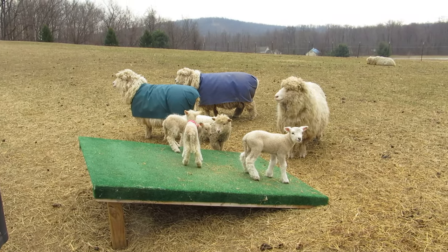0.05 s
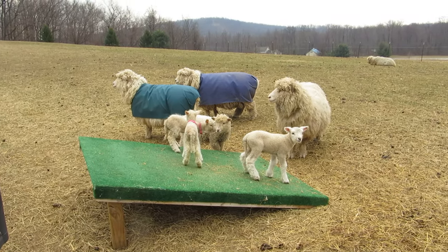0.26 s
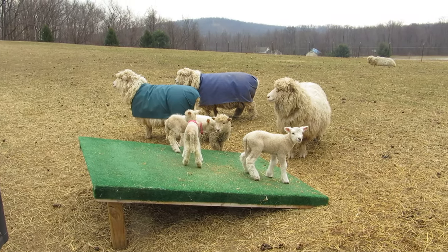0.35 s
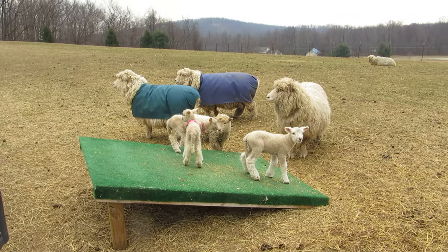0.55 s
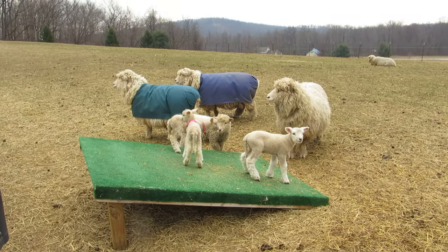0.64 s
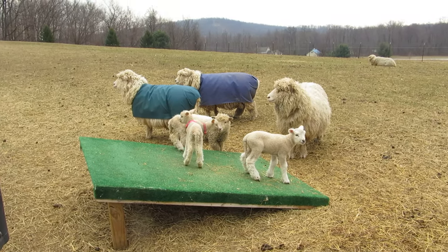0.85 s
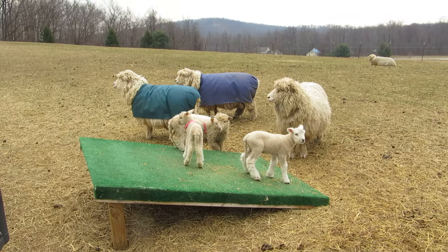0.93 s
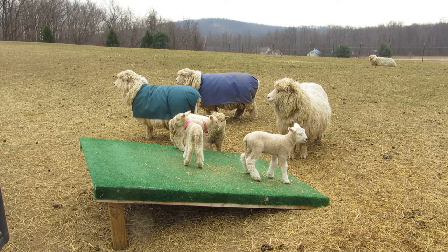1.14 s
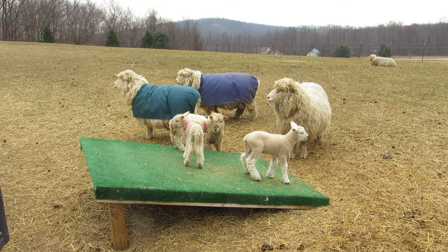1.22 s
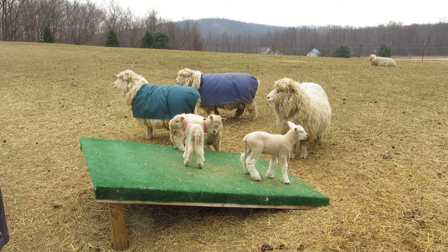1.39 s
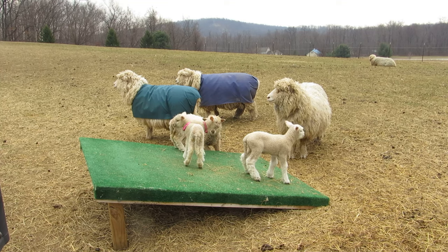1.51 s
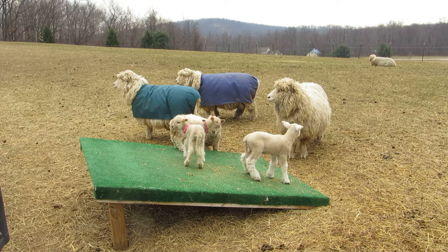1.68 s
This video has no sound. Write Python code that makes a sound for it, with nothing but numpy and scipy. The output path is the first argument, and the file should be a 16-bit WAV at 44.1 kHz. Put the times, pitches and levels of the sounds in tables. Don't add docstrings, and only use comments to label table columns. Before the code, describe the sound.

One long clear lamb bleat with hoarse edges, then faint hoof knocks on boards outdoors

```python
import sys
import numpy as np
from scipy import signal
from scipy.fft import rfft, irfft, next_fast_len
from scipy.io import wavfile
from scipy.ndimage import uniform_filter1d, map_coordinates

SR = 44100
rng = np.random.default_rng(int(sys.argv[2]) if len(sys.argv) > 2 else 0)


def generate_wav(signal):
    frames = np.transpose(np.atleast_2d(signal))
    scaled = np.clip(frames, -1, 1) * 32767
    pcm = np.round(scaled).astype(np.int16)
    wavfile.write(sys.argv[1], SR, pcm)


def level_to_linear(level):
    exponent = np.asarray(level, float) / 20
    return 10 ** exponent


N = 77175

# t/s, pitch f/Hz, level/dB, effort (treble tilt)/dB
CATCH = [
    (0.14, 291.1, -72, -15),
    (.152, 307, -51, -8),
    (.166, 352, -35.5, 0),
    (0.174, 353.3, -29.5, -7),
    (0.187, 345.4, -32.5, 4),
    (0.205, 344.6, -42.5, 6),
]
RISE = [
    (.214, 369, -39, 12),
    (.222, 379.8, -31.5, -0.5),
    (.254, 391.9, -21.5, -7),
    (0.285, 391.7, -22.5, -9.5),
    (0.305, 405.7, -20.5, -3),
]
CALL = [
    (0.342, 401.8, -20, -5.5),
    (0.428, 403.7, -21, -4.5),
    (0.548, 408.3, -19, -2),
    (0.684, 406.1, -19, -2),
    (0.701, 409.7, -18.5, -2),
    (.952, 405.3, -20, -2),
    (1.018, 402.7, -21.5, -6.5),
]
DYING = [
    (1.035, 400.7, -24, -14),
    (1.05, 406.3, -23.5, -15),
    (1.14, 400.2, -30, -17),
    (1.164, 388.3, -34.5, -17),
    (1.178, 351.3, -40, -12),
    (1.19, 337, -40, -25),
    (1.201, 329, -60, -28),
]
# t/s, level over voice/dB
BREATHINESS = [(.14, -6), (.175, -15), (.205, -7), (.235, -28), (.285, -33), (.31, -23), (.35, -38),
               (.6, -41), (1.1, -40), (1.135, -30), (1.155, -11), (1.2, -7)]
# t/s, opening/0-1
MOUTH_OPENING = [(.14, 0.35), (.2, 0.3), (.27, 0.48), (.33, 0.54), (.5, 0.78), (1.0, 0.83), (1.06, 0.74),
                 (1.16, 0.62), (1.2, 0.67)]
# t/s, amount/0-1
UNSTEADY = [(.26, .3), (.31, 1), (.36, .3), (.94, .35), (1.01, 1.1), (1.06, .5), (1.14, .8)]
# f/Hz, width/Hz, level/dB
OPEN_THROAT = [(830, 404, -1), (1243, 154, 6.5), (1647, 364, 3.83), (1960, 94, -4.5), (2935, 1100, -8.5),
               (3356, 600, -3), (4186, 505, -4), (4890, 1010, 1), (5504, 800, 0), (6650, 780, -1),
               (8460, 2260, -10.5), (10800, 1640, -13)]
# f/Hz, width/Hz, level/dB
NARROW_THROAT = [(731, 120, -3.5), (1302, 127, 2), (1604, 420, -6.5), (3454, 104, 5.5), (4170, 384, 4),
                 (5410, 310, 7), (7300, 790, -2), (8240, 1730, -11)]
# f/Hz, width/Hz
SIDE_CAVITIES = [(2450, 154), (3650, 93), (4500, 1000), (5300, 180), (9700, 450)]
# f/Hz, level/dB
SOURCE_TILT = [(300, -5), (800, -1.5), (1500, 2.5), (4000, -1), (9000, -6), (12000, -8.5), (16000, -30)]
# f/Hz, left-right level/dB
VOICE_PAN = [(60, 25), (150, 6), (380, 7.5), (950, 3), (2380, 0.5), (5980, 4), (15000, -5)]
# f/Hz, left-right phase/rad
VOICE_LEAD = [(260, -2.3), (450, -1.6), (1120, -.7), (2580, -1), (2840, -.4), (4740, -.6), (8700, -1.3),
              (11000, -.5)]
# f/Hz, t60/s
TREES_T60 = [(300, .6), (800, .6), (1200, 1.1), (1600, 2.2), (3300, 1.5), (5000, 1), (7000, .5),
             (10000, .3)]
# t/s, peak level/dB, board f/Hz, t60/s, crack level/dB
KNOCKS = [(.812, -30.5, 151, 0.057, -24.5), (.818, -34, 530, 0.036, -22), (.833, -36.5, 337, 0.036, -27),
          (.828, -35.5, 168, 0.092, -30), (0.844, -35, 44.5, 0.21, -40), (1.034, -40, 148.8, 0.053, -28),
          (1.303, -40.5, 650, 0.013, -25.5), (1.448, -41.5, 308, 0.033, -14), (1.484, -40, 333, 0.04, -26),
          (1.526, -47, 166.6, 0.049, -26), (1.624, -40.5, 153, 0.037, -21), (1.659, -32, 364, 0.028, -6.5),
          (1.682, -44, 410, 0.026, -2)]
# t/s, length/s, level/dB
SCUFFS = [
    (.62, .07, -51),
    (.805, .055, -51),
    (1.42, .05, -53),
    (1.445, .07, -54),
    (1.515, .03, -58),
    (1.62, .038, -47),
    (1.657, .042, -49),
]
# f/Hz, level per Hz/dB
STRAW_SPECTRUM = [(59, -47), (100, -2.5), (383, -6), (803, -12), (943, -9), (1980, -3.5), (12000, -29.5),
                  (15600, -64), (22000, -120)]
# f/Hz, level/dB
EWE_PARTIALS = [(495.3, -55.5), (2035, -64.5)]
# f/Hz, level per Hz/dB
AIR_SPECTRUM = [(24, -46), (40, -5), (429, -14), (499, -14.5), (802, -8.5), (1610, -12.5), (2870, -17),
                (3170, -17.5), (15700, -34.5)]
# f/Hz, likeness/-1 to 1
AIR_LIKENESS = [(60, -0.61), (240, -0.61), (950, -0.66), (3770, -0.6), (15000, -0.43)]
# f/Hz, left-right level/dB
AIR_PAN = [(60, 6.0), (380, 2.5), (2380, 1.5), (15000, 0.5)]

JITTER, SHIMMER_DB, FLUTTER_DB = .001, .4, 1.1
MOVING_ABOVE_HZ, TONGUE_SHIFT = 3400, .014
SPREAD_S_PER_HZ = 2e-7
CHEST_LAG_RAD, CHEST_HZ = 2.2, 1000
UPPER_HZ, UPPER_LEAD_S = 2450, .0009
BLUR_RAD, BLUR_HZ = .09, 8000
BREAK_HZ, BREAK_WIDTH_HZ = 3900, 1000
BEAT, BEAT_HZ, BEAT_WIDTH_HZ = .75, 4480, 260
TEETH_HZ, TEETH_WIDTH_HZ, TEETH_DB, TEETH_FOLLOWS = 9500, 3000, -60, .35
NEAR_DB, NEAR_T60_S = -22, .2
TREES_DB, TREES_ONSET_S, TREES_LIFT_DB_PER_OCT = -25.5, .06, 5
CRACK_HZ, CRACK_T60_S, KNOCK_PAN_DB = 1804, .041, 13.5
GRAINS_PER_S, GRAIN_DB = 2500, 2.5
EWE_END_S, EWE_T60_S, EWE_RISE_PER_S = .13, 1, .8
AIR_DB = -45.5
DUCK_DB, DUCK_HZ, DUCK_S, LOUD_DB = -13, 1200, .03, -19
LOW_CUT_HZ = 50


def unit(x):
    return x / np.sqrt(np.mean(np.abs(x) ** 2) + 1e-20)


def over_time(points, t):
    return np.interp(t, *np.transpose(points))


def along(points, hz):
    f, v = np.transpose(points)
    return np.interp(np.log(hz + 1), np.log(f + 1), v)


def wobble(rate_hz, count=1):
    knots = rng.standard_normal((count, int(N / SR * 400) + 4))
    place = np.arange(N) * min(rate_hz, 400) / SR
    return np.array([map_coordinates(k, [place]) for k in knots])


def filtered(x, response):
    m = next_fast_len(N + SR // 2)
    return irfft(rfft(x, m) * response(np.fft.rfftfreq(m, 1 / SR)), m)[..., :N]


def ports(x, pan, lead):
    half = np.array([[.5], [-.5]])
    return filtered(x, lambda hz: level_to_linear(half * along(pan, hz)) * np.exp(1j * half * along(lead, hz)))


def causal(gain):
    cepstrum = irfft(np.log(gain + 1e-6), axis=0)
    half = len(cepstrum) // 2
    cepstrum[1:half] *= 2
    cepstrum[half + 1:] = 0
    return rfft(cepstrum, axis=0)


def throat(hz, shift, opening):
    def peak(c, width):
        return (hz / c) * 1j * width / c / (1 - (hz / c) ** 2 + 1j * hz * width / c ** 2)

    def moved(c):
        return c * (1 + shift * (c > MOVING_ABOVE_HZ))

    def tube(rows):
        modes = [(-1) ** k * level_to_linear(db) * peak(moved(c), width) for k, (c, width, db) in enumerate(rows)]
        return np.abs(sum(modes)) + 1e-4

    out = tube(OPEN_THROAT) ** opening * tube(NARROW_THROAT) ** (1 - opening)
    for c, width in SIDE_CAVITIES:
        depth = 0.958 * np.where(c > MOVING_ABOVE_HZ, opening, 1)
        out = out * np.abs(1 - depth * peak(moved(c), width))
    return out * level_to_linear(along(SOURCE_TILT, hz))


def overtone_gains(hz, t_hop, hop, effort, opening):
    count = len(hz)
    tongue = TONGUE_SHIFT * wobble(29.17)[0, hop]
    grid = np.linspace(0, SR / 2, 513)[:, None]
    tilt = level_to_linear(1.88 * effort * np.log2(np.clip(grid / 5400, 1, 1.36)))
    tube = causal(throat(grid, tongue, opening) * tilt)
    at = [hz / grid[1], np.arange(hz.shape[1]) + 0 * hz]
    gain = np.exp(map_coordinates(tube.real, at, order=1) + 1j * map_coordinates(tube.imag, at, order=1))

    gain = gain * level_to_linear(FLUTTER_DB * wobble(31.6, count)[:, hop] * np.clip(hz / 4000, .2, 1))
    beat = BEAT * opening * np.exp(-((hz - BEAT_HZ) / BEAT_WIDTH_HZ) ** 2)
    gain = gain * (1 + beat * wobble(60, count)[:, hop])
    chest = -CHEST_LAG_RAD / (1 + (hz / CHEST_HZ) ** 8)
    lead = 2 * np.pi * UPPER_LEAD_S * np.maximum(hz - UPPER_HZ, 0)
    gain = gain * np.exp(1j * (chest + lead))
    breakup = over_time(UNSTEADY, t_hop) * np.exp(-((hz - BREAK_HZ) / BREAK_WIDTH_HZ) ** 2)
    gain = gain * (1 + .6 * breakup * wobble(75, count)[:, hop])
    gain = gain * np.exp(1j * BLUR_RAD * hz / BLUR_HZ * wobble(170, count)[:, hop])
    return gain / np.sqrt(np.sum(np.abs(gain) ** 2, axis=0) / 2)


def breath_noise(gated, effort):
    breath = unit(filtered(gated, lambda f: throat(f, 0, .1) ** 1.3 * level_to_linear(np.log2(f / 1500 + .1))))
    soft = filtered(breath, lambda f: 1 / (1 + 1j * f / 2200) ** 2)
    return breath + np.clip(-effort / 24 - .5, 0, .5) * 2 * (soft - breath)


def lamb():
    t, hop = np.arange(N) / SR, slice(0, N, 128)
    s, *cols = np.transpose(np.vstack([CATCH, RISE, CALL, DYING]))
    pitch_hz, level_db, effort = [np.interp(t, s, c) for c in cols]
    hoarse = level_to_linear(over_time(BREATHINESS, t))
    opening = np.clip(over_time(MOUTH_OPENING, t), 0, 1)

    roughness = (.015 + .3 * hoarse) * hoarse * wobble(230)[0]
    phase = 2 * np.pi * np.cumsum(pitch_hz * (1 + JITTER * wobble(22.9)[0] + roughness)) / SR
    orders = np.arange(1, 40)
    gains = overtone_gains(orders[:, None] * pitch_hz[hop], t[hop], hop, effort[hop], opening[hop])
    tone = np.zeros(N)
    for n, g in zip(orders, gains):
        moving = np.interp(t, t[hop], g.real) + 1j * np.interp(t, t[hop], g.imag)
        spread = np.pi * SPREAD_S_PER_HZ * (n * pitch_hz.mean()) ** 2
        tone -= np.real(moving * np.exp(1j * (n * phase - spread)))

    gated = rng.standard_normal(N) * (0.64 + (1 + np.cos(phase)) ** 2 / 4)
    voice = (tone + hoarse * breath_noise(gated, effort)) / np.sqrt(1 + hoarse ** 2)
    voice = voice * level_to_linear(level_db + SHIMMER_DB * wobble(61.44)[0])
    teeth = unit(filtered(gated, lambda f: np.exp(-((f - TEETH_HZ) / TEETH_WIDTH_HZ) ** 2)))
    teeth = teeth * level_to_linear(TEETH_DB + TEETH_FOLLOWS * (level_db + 23))
    sounding = (t > s[0]) & (t < s[-1])
    return sounding * (voice + teeth)


def hooves():
    knocks, t = np.zeros(N + SR), np.arange(SR // 4) / SR
    for s, db, hz, t60, crack_db in KNOCKS:
        modes = np.sin(2 * np.pi * hz * t) + 0.33 * np.sin(2 * np.pi * 1.706 * hz * t)
        ring = level_to_linear(-60 * t / t60) * modes * (1 - np.exp(-t * hz * 4))
        splinters = sum(np.sin(2 * np.pi * CRACK_HZ * r * t) for r in rng.uniform(0.82, 1.386, size=3))
        crack = level_to_linear(crack_db - 60 * t / CRACK_T60_S) * splinters / 2
        start = round(s * SR)
        knocks[start:start + len(t)] += level_to_linear(db) * (ring + crack)
    knocks = knocks[:N] * level_to_linear(KNOCK_PAN_DB * np.array([[.5], [-.5]]))

    t = np.arange(N) / SR
    stroke = np.zeros(N)
    for s, length, db in SCUFFS:
        stroke += level_to_linear(db) * np.sqrt(np.abs(np.sin(np.pi * np.clip((t - s) / length, 0, 1))))
    grains = (rng.random(N) < GRAINS_PER_S / SR) * rng.standard_normal(N)
    grains = grains * level_to_linear(GRAIN_DB * rng.exponential(size=N))
    rub = rng.standard_normal((2, N))
    straw = unit(filtered(unit(grains) + rub, lambda f: level_to_linear(along(STRAW_SPECTRUM, f))))
    return knocks + ports(stroke * level_to_linear(1.25 * wobble(110)) * straw, VOICE_PAN, VOICE_LEAD)


def echoes(x):
    hz, t, z = signal.stft(rng.standard_normal((2, SR)), SR, nperseg=256)
    decay_db = -60 * t / along(TREES_T60, hz)[:, None]
    lift_db = TREES_LIFT_DB_PER_OCT * np.log2(np.clip(hz / 1200, 1, 3))[:, None]
    far = signal.istft(z * level_to_linear(decay_db + lift_db), SR, nperseg=256)[1][:, :SR]
    t = np.arange(SR) / SR
    near = rng.standard_normal((2, SR)) * level_to_linear(-60 * t / NEAR_T60_S)
    tail = level_to_linear(TREES_DB) * far * np.clip(t / TREES_ONSET_S, 0, 1) / np.linalg.norm(far[0])
    tail = tail + level_to_linear(NEAR_DB) * near / np.linalg.norm(near[0])
    return signal.fftconvolve(x[None], tail, axes=1)[:, :N]


def ewe():
    late = np.maximum(np.arange(N) / SR - EWE_END_S, 0)
    turns = np.cumsum(1 + EWE_RISE_PER_S * late) / SR
    call = np.zeros((2, N))
    for hz, db in EWE_PARTIALS:
        level = level_to_linear(db + 1.0 + 0.6 * wobble(28.4, count=2))
        call += level * np.sin(2 * np.pi * hz * turns + 2.06 * wobble(19.1, count=2))
    return level_to_linear(-60 * late / EWE_T60_S) * call


def air():
    z = signal.stft(rng.standard_normal((2, N)), nperseg=512)[2]
    patches = uniform_filter1d(rng.standard_normal(z.shape[1:]), size=5, axis=0)
    patches = uniform_filter1d(patches, size=10, axis=1)
    pair = signal.istft(z * level_to_linear(1.3 * unit(patches)), nperseg=512)[1][:, :N]

    def mid_side(hz):
        turn = np.arccos(np.clip(along(AIR_LIKENESS, hz), -1, 1)) / 2
        return level_to_linear(along(AIR_SPECTRUM, hz)) * np.array([np.cos(turn), np.sin(turn)])

    mid, side = filtered(pair, mid_side)
    both = ports(np.array([mid + side, mid - side]), AIR_PAN, [(1, 0.016)])
    return level_to_linear(AIR_DB + 0.09 * wobble(10.8)) * unit(both)


def scene():
    voice, hiss = lamb(), air()
    envelope = np.sqrt(np.abs(uniform_filter1d(voice ** 2, size=round(DUCK_S * SR))))
    loud = np.clip(envelope / level_to_linear(LOUD_DB), 0, 1)
    upper = filtered(hiss, lambda hz: hz ** 2 / (hz ** 2 + DUCK_HZ ** 2))
    ducked = hiss + (level_to_linear(DUCK_DB * loud) - 1) * upper
    return ports(voice, VOICE_PAN, VOICE_LEAD) + echoes(voice) + hooves() + ewe() + ducked


def roll_off(x):
    return signal.sosfilt(signal.butter(12, 15820, fs=SR, output="sos"), x)


def record(dry):
    mix = filtered(dry, lambda hz: (1j * hz / (1j * hz + LOW_CUT_HZ)) ** 2)
    return roll_off(mix)


dry = scene()
out = record(dry)
generate_wav(out)
```